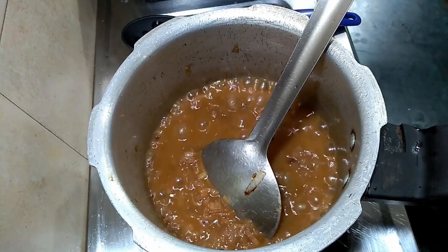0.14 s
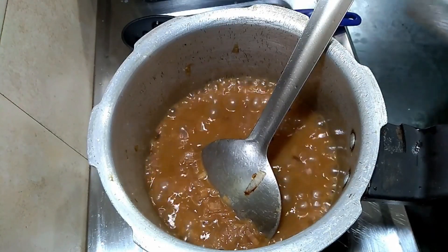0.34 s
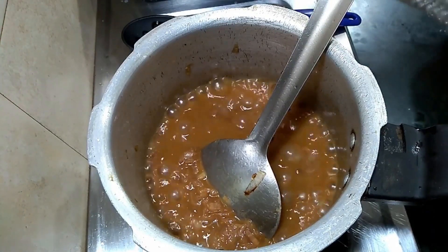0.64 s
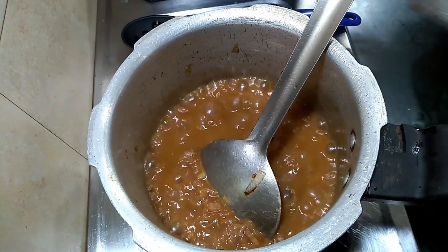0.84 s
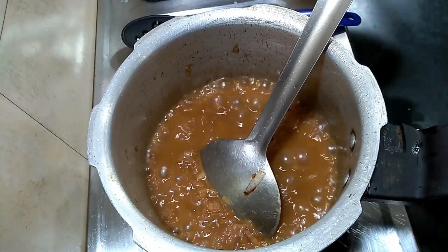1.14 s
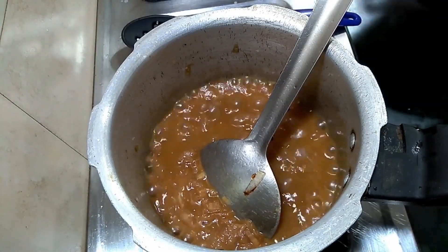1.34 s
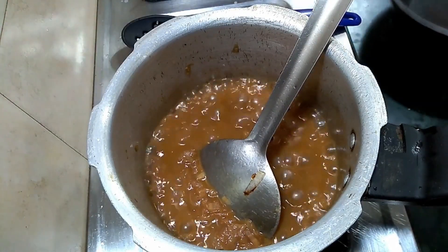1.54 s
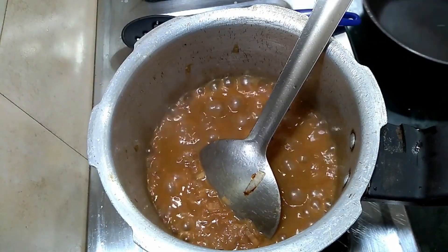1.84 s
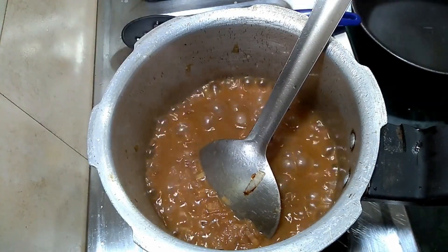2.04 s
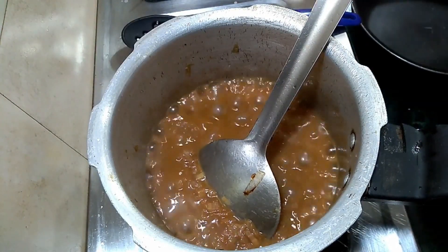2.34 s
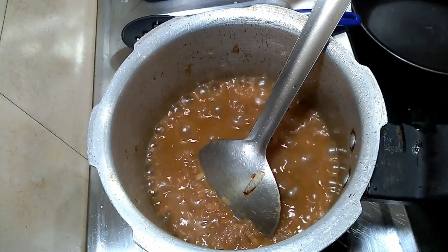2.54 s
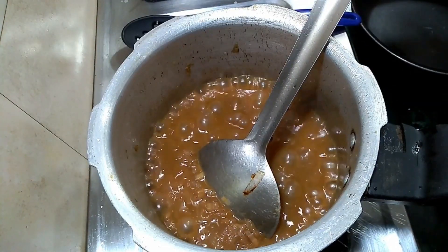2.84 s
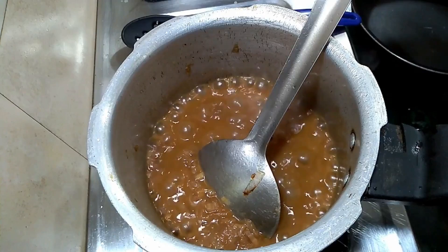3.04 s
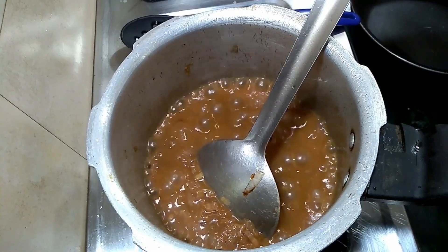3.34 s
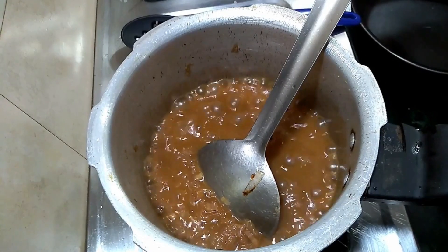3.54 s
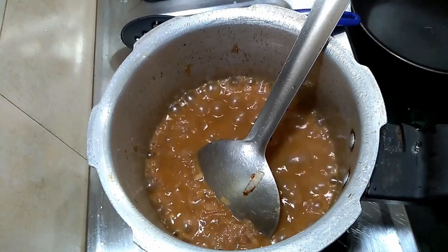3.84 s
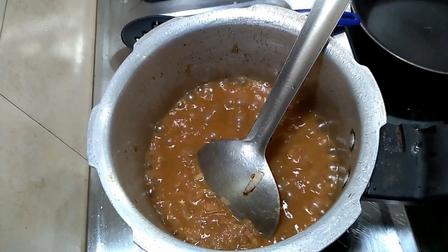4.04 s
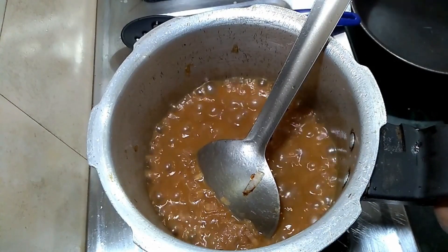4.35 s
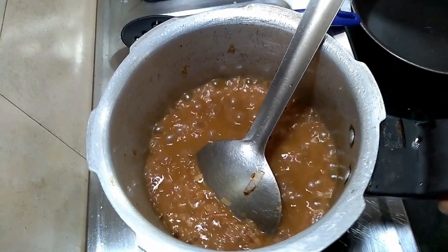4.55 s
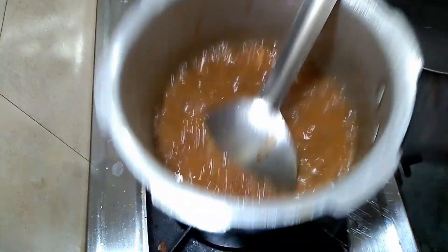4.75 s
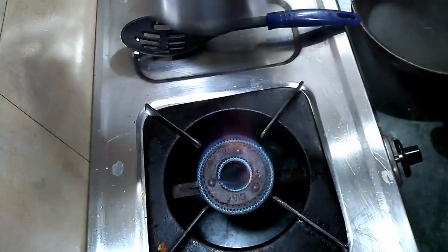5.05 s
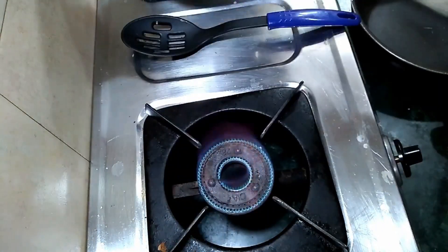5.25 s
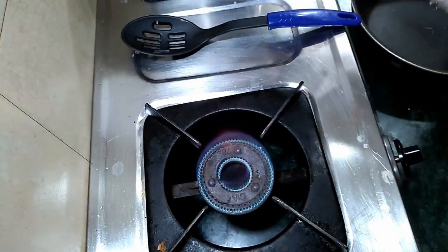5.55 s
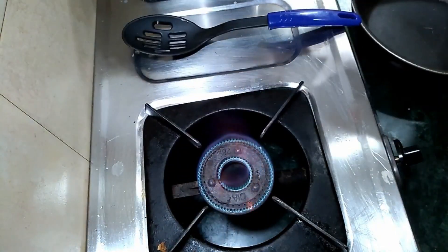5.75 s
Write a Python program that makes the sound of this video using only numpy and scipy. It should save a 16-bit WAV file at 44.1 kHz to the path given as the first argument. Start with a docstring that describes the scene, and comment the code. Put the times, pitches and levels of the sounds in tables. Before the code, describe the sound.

Thick sauce bubbles and spits in an open metal pot amid cookware clangs, then the pot is lifted and set down with a clank.

```python
"""Thick sauce boils hard in an open aluminium pot on a gas ring in a small kitchen.
Ringing bubbles excite the air resonances of the pot, and their bursting films crackle and spit.
A pan is dragged out with a stick-slip judder and put down with a clang; utensils knock and clink.
The pot is lifted, sauce hissing on its hot wall, and lands on the counter with a clank.
The flame roars softly underneath, and the loudest blows overload the microphone."""
import sys
import numpy as np
from scipy import signal
from scipy.fft import rfft, irfft, next_fast_len
from scipy.io import wavfile

SR = 44100
rng = np.random.default_rng(int(sys.argv[2]) if len(sys.argv) > 2 else 0)


def dump_mix(stems):
    """Bounce the given channels to the path in sys.argv[1] as a 16-bit WAV at rate SR."""
    frames = np.atleast_2d(stems).T  # one column per channel
    limited = np.clip(frames, -1, 1)  # hard clip at full scale
    pcm = np.round(limited * 32767).astype(np.int16)
    wavfile.write(sys.argv[1], SR, pcm)


N = 259528
TIME = np.arange(N) / SR

# spectrum of bursting films: frequency_hz, level_db
FILM_SPECTRUM = [(2500, -44), (4500, -7), (5100, -2.5), (6200, -6.5), (8800, 2.5), (10600, -3),
                 (11300, -14.5), (12500, -21.5), (15500, -43.5)]


def boil():
    """Cavity resonance: big bubbles excite the pot's air; tiny ones crackle and echo between its walls."""
    # the boil heard from above: time_s, bubbling_db, sizzle_db
    above_levels = [(0, -36.5, -32.5), (1.1, -34, -32.5), (2.1, -34, -34), (2.32, -36, -40),
                    (2.6, -33, -34), (3.4, -35, -34), (3.85, -34.5, -29), (4.6, -32.5, -33.5),
                    (4.8, -38.5, -29.5), (4.98, -67, -51), (5.08, -81, -40.5), (5.19, -82, -38),
                    (5.27, -61, -54.5)]
    # air resonances over the sauce: frequency_hz, width_hz, level_db
    air_modes = [(141, 90, -5), (430, 343, -2), (759, 350, -1), (1033, 316, -8), (1567, 440, 0),
                 (2360, 290, -5.5), (3500, 250, -13), (4180, 380, -12)]
    # the simmer as the pot is carried away: time_s, level_db
    carried_levels = [(4.5, -70), (4.76, -34), (4.95, -39), (5.2, -36), (5.26, -45), (5.5, -46)]
    # its hollow ring heard from the side: frequency_hz, width_hz, level_db
    side_modes = [(590, 130, -4), (745, 90, 3), (860, 70, -1), (1500, 230, -10), (2750, 150, -21),
                  (3400, 220, -21), (4100, 260, -24), (9300, 700, -13)]
    bubbling, sizzle = gains(above_levels)
    plops = bubbles(per_s=950, low_hz=110, high_hz=5000, cycles=15, spread_db=3.3, clump_db=3, rise=.08)
    crackle = bubbles(per_s=1500, low_hz=2200, high_hz=15500, cycles=20,
                      spread_db=5, clump_db=4.2, rise=.04)
    plops = reflect(plops, t60_s=0.041, wet_db=0)
    crackle = reflect(crackle, t60_s=0.084, wet_db=1.5)
    from_above = bubbling * resonate(plops, air_modes) + sizzle * coloured(crackle, FILM_SPECTRUM)
    from_side = gains(carried_levels)[0] * resonate(plops + crackle, side_modes)
    return from_above + from_side


def bubbles(per_s, low_hz, high_hz, cycles, spread_db, clump_db, rise):
    """Damped oscillation: bubbles burst in random clumps, each ringing and rising in pitch as it opens."""
    burst_chance = per_s * amp(clump_db * drift(25)) / SR
    born = np.flatnonzero(rng.random(N) < burst_chance)
    pitch, size, sign = rng.random((len(born), 3)).T[:, :, None]
    hz = low_hz + (high_hz - low_hz) * pitch
    size_db = spread_db * np.minimum(-np.log(1 - size), 4)  # many faint, a few loud
    height = amp(size_db) * np.sqrt(hz) * np.sign(sign - .5)
    age = np.arange(int(cycles / low_hz * SR))
    turns = hz * age / SR
    rings = height * np.sin(2 * np.pi * turns * (1 + rise * turns / cycles)) * fade(turns, cycles)
    positions = born[:, None] + age
    return rms_one(np.bincount(positions.ravel(), rings.ravel(), N)[:N])


def glugs(swell_s, rise_per_s):
    """Helmholtz resonance: a big bubble's note swells, rises as its mouth widens, and dies."""
    # single big bubbles opening: start_s, peak_db, starting_pitch_hz
    openings = [(1.430, -26, 925), (5.194, -23, 688)]
    out, t = np.zeros(N), TIME[:SR // 20]
    for start_s, db, hz in openings:
        swell = t / swell_s * np.exp(1 - t / swell_s)
        phase = 2 * np.pi * hz * t * (1 + rise_per_s * t / 2)
        add(out, start_s, amp(db) * swell * np.sin(phase))
    return out


def spits(pitch_hz, ring_s, snap_db):
    """Impulsive release of tension: a taut film snaps with a click and a very short high ring."""
    # single loud spits: start_s, peak_db
    ruptures = [(0.145, -19), (0.221, -19), (.3257, -2.5), (0.5192, -9), (0.73, -12), (1.0736, -19),
                (1.2154, -9), (1.369, -12.5), (1.674, -8), (2.5173, -13.5), (3.194, -9), (3.6103, -16),
                (3.8148, -16), (4.0717, -17), (4.3466, -14), (4.7118, -12)]
    out, t = np.zeros(N), TIME[:SR // 50]
    for start_s, db in ruptures:
        hz = pitch_hz * np.exp(0.18 * rng.standard_normal())
        snap = amp(snap_db) * rng.standard_normal(len(t))
        burst = (np.sin(2 * np.pi * hz * t) + snap) * fade(t, ring_s)
        padded = np.r_[np.zeros(len(t)), burst]
        spit = coloured(padded, FILM_SPECTRUM)[len(t):]
        add(out, start_s, amp(db) * spit / np.abs(spit).max())
    return reflect(out, t60_s=.07, wet_db=-5)


def wall_hiss():
    """Flash boiling: sauce turns to steam on the hot wall in a dense fizz of tiny bubbles."""
    # sauce washing up the wall as the pot is lifted: time_s, level_db
    levels = [(4.45, -94), (4.56, -29), (4.66, -31), (4.76, -32.5), (4.87, -48), (5.2, -101)]
    # spectrum of the steam: frequency_hz, level_db
    spectrum = [(1500, -5.5), (9000, 2), (11500, 3.5), (15500, -15)]
    fizz = bubbles(per_s=6700, low_hz=990, high_hz=15500, cycles=3.6, spread_db=5.5, clump_db=2, rise=0)
    return gains(levels)[0] * coloured(fizz, spectrum)


def pot_clank():
    """Impact excitation: the pot lands and rattles on the counter, each contact ringing its shell."""
    # contacts: start_s, level_db, brightness_db_per_octave, t60_s
    blows = [(5.4708, -7.5, 5, .06), (5.4795, -7, 1, 0.37), (5.516, -7, -1.5, 0.091),
             (5.524, -12.5, 6, 0.19), (5.545, -13, 0, 0.35), (5.590, -15.5, 0, 0.15),
             (5.611, -25.5, 2, 0.25), (5.693, -22, -1.5, 0.22), (5.7285, -16, 1.5, 0.21),
             (5.7955, -24.5, 1, .25)]
    # clatter spectrum: frequency_hz, level_db
    spectrum = [(70, -27.5), (300, 0.5), (750, -4), (1050, -8.5), (1450, -7), (2100, -11.5), (3700, -5.5),
                (5300, -12.5), (9300, -14), (11500, -22), (15500, -33)]
    # shell modes: pitch_hz, level_db, t60_s
    modes = [(298.3, -4, 0.25), (385, -8.5, 0.18), (496.3, -7, 0.27), (795, -12, .3), (826, -7, 0.23),
             (2820, -23, 0.23), (3472, -11, 0.17), (3480, -26, 0.16), (3796, -10, 0.25), (4730, -23, .3),
             (9700, -10.5, 0.19)]
    return struck(blows, spectrum, modes, modes_db=-2, damping=0.21, grit_db=1)


def pan_drag(slips_per_s):
    """Stick-slip friction: the pan's foot catches and slips on the counter, shaking its body."""
    # course of the drag: time_s, judder_db, rasp_db
    levels = [(.62, -67, -90), (.745, -29, -37), (.768, -22.5, -35), (.798, -34.5, -44), (.813, -17.5, -28),
              (.835, -20, -25.5), (.852, -25, -35), (.885, -26, -18.5), (.92, -27, -29), (.948, -16, -25),
              (.975, -17.5, -27), (1.17, -98, -84)]
    # resonances of the dragged pan: frequency_hz, width_hz, level_db
    body_modes = [(270, 130, -2), (371, 100, 1), (510, 130, -6), (860, 110, 7), (1030, 150, -4),
                  (1370, 200, -4), (2380, 300, -12)]
    # rasp of its foot: frequency_hz, level_db
    rasp_spectrum = [(300, -4.5), (2400, 7.5), (4400, 4.5), (7600, 2.5), (10500, -3.5), (12000, -25)]
    judder, rasp = gains(levels)
    slips = (rng.random(N) < slips_per_s / SR) * rng.choice([-1, 1], N)
    slips = reflect(slips, t60_s=0.076, wet_db=0)
    return judder * resonate(slips, body_modes) + rasp * coloured(slips, rasp_spectrum)


def pan_clang():
    """Free vibration: the pan is put down hard and rings in inharmonic modes."""
    # contacts: start_s, level_db, brightness_db_per_octave, t60_s
    blows = [(1.5852, 1.5, 0, 0.2), (1.601, -10, 3, 0.21), (1.622, -15.5, -1.5, 0.36),
             (1.646, -11, -5, 0.13)]
    # clatter spectrum: frequency_hz, level_db
    spectrum = [(150, -15.5), (450, -2.5), (760, 3.5), (1300, -2), (1900, -8.5), (4400, -12), (6200, -11),
                (8500, -11.5), (15500, -38)]
    # body modes: pitch_hz, level_db, t60_s
    modes = [(572, -11.5, .28), (730, -7, 0.23), (759.3, 5, 0.19), (1141, -8, 0.24), (1243, -12, 0.25),
             (1470, -6, 0.17), (2390, -18, .18), (5250, -16, 0.2), (5997, -15, .18), (6340, -11.5, .2)]
    return struck(blows, spectrum, modes, modes_db=-2.5, damping=0.2, grit_db=3.5)


def utensil_tink():
    """Impact excitation: a thin steel utensil, struck once, chatters and rings high."""
    # contacts: start_s, level_db, brightness_db_per_octave, t60_s
    blows = [(3.0308, 3.5, 1, 0.047), (3.033, -6.5, 0.62, 0.22), (3.044, -18, -2.2, 0.44)]
    # chatter spectrum: frequency_hz, level_db
    spectrum = [(70, -7), (300, -5), (5500, -7), (7000, -3), (8500, 5), (11500, 0.5), (14500, -2),
                (15700, -13)]
    # high ring of the tink, with a bright overload edge: pitch_hz, level_db, t60_s
    high_ring = [(7900, -13, 0.12), (12700, -25, .16)]
    return struck(blows, spectrum, high_ring, modes_db=2, damping=0.14, grit_db=1.5)


def utensil_clink():
    """Elastic rebound: a heavier utensil is put down with a bounce and rings at each contact."""
    # contacts: start_s, level_db, brightness_db_per_octave, t60_s
    blows = [(4.0945, -11.5, 0.086, 0.028), (4.0955, -13.5, -1.2, 0.24), (4.1268, -2, 0.22, 0.15),
             (4.144, -15, 0.22, 0.42), (4.1722, -20, 0.48, .02)]
    # clatter spectrum: frequency_hz, level_db
    spectrum = [(70, -9), (330, -5), (2500, -4.5), (5500, -1), (6300, -6), (8500, 6.5), (10700, 4),
                (11800, -8), (15500, -10)]
    # ringing modes: pitch_hz, level_db, t60_s
    modes = [(8800, -22, 0.15), (9800, -26, .2)]
    return struck(blows, spectrum, modes, modes_db=-7, damping=0.13, grit_db=3)


def counter_knocks():
    """Frequency-dependent damping: cookware knocks on the counter, wooden as the treble dies fast."""
    # knocks: start_s, level_db, brightness_db_per_octave, t60_s
    blows = [(.81, -25.5, 0, 0.22), (.936, -22, -1.3, 0.23), (1.8055, -24, -2.8, 0.18),
             (2.578, -22.5, 2, 0.51), (2.6055, -17.5, -0.67, 0.19), (3.248, -26.5, -0.72, 0.32),
             (3.983, -28.5, 0.3, 0.32), (4.386, -27, -2.3, 0.18), (4.4975, -22.5, -0.23, 0.24)]
    # knock spectrum: frequency_hz, level_db
    spectrum = [(70, -27), (290, -1), (750, -1.5), (1150, -13), (2400, -15), (9000, -21), (15500, -42)]
    # wooden modes: pitch_hz, level_db, t60_s
    modes = [(343, -5.5, 0.15), (510, -2, 0.21), (835, -7.5, 0.31)]
    return struck(blows, spectrum, modes, modes_db=0, damping=0.28, grit_db=3.5)


def counter_thuds():
    """Panel resonance: dull bumps set the counter booming in its low modes."""
    # bumps: start_s, level_db, brightness_db_per_octave, t60_s
    blows = [(1.976, -30.5, 0, 0.32), (3.195, -27, 0.58, .3), (3.2245, -22.5, 0.88, 0.29),
             (4.728, -35, -1.3, .12)]
    # thud spectrum: frequency_hz, level_db
    spectrum = [(40, -38), (160, 2), (260, -15.5), (1500, -27.5), (15000, -47)]
    # panel modes: pitch_hz, level_db, t60_s
    modes = [(99, -3, .8), (124, -12, .35)]
    return struck(blows, spectrum, modes, modes_db=0, damping=0.069, grit_db=1.5)


def flame(level_db):
    """Combustion noise: the gas burner gives a soft, fluttering roar."""
    # spectrum of the roar: frequency_hz, level_db
    spectrum = [(25, -27), (110, 3.5), (170, -1.5), (250, -7.5), (430, 0), (750, 2), (1020, -28.5),
                (1500, -6), (2100, -36.5), (15000, -62)]
    flutter_db = 1.5 * drift(18)
    return amp(level_db + flutter_db) * coloured(rng.standard_normal(N), spectrum)


def struck(blows, spectrum, modes, modes_db, damping, grit_db):
    """Modal superposition: each blow rings clear modes and a dense clatter whose treble dies first."""
    out, size = np.zeros(N), 2 ** 15
    t, hz = TIME[:size], np.fft.rfftfreq(size, 1 / SR)
    centres_hz = 125 * 2. ** np.arange(8)
    octaves = np.array([np.interp(np.log(hz + 1), np.log(centres_hz), row) for row in np.eye(8)])
    mode_hz, mode_db, mode_t60 = np.transpose(modes)[:, :, None]
    plain = amp(at_hz(spectrum, hz))
    for start_s, db, brightness, t60_s in blows:
        tilted = plain * amp(brightness * np.log2((hz + 50) / 1000))
        mode_tilt = amp(brightness * np.log2(mode_hz / 1000))
        mode_tilt *= np.linalg.norm(plain) / np.linalg.norm(tilted)
        bands = irfft(octaves * tilted * np.exp(2j * np.pi * rng.random(len(hz))))
        band_t60 = t60_s * (1000 / centres_hz[:, None]) ** damping  # t60_s holds at 1 kHz
        grit = amp(grit_db * drift(311)[:size])
        clatter = grit * (bands * fade(t, band_t60)).sum(0) / bands.sum(0).std()
        strengths = amp(modes_db + mode_db + rng.normal(0, 1, mode_db.shape)) * mode_tilt
        ring = (strengths * np.sin(2 * np.pi * mode_hz * t) * fade(t, mode_t60)).sum(0)
        add(out, start_s, amp(db) * (clatter + ring))
    return out


def resonate(x, resonances):
    """Parallel resonators, each passed twice so that deep hollows lie between them; rms 1."""
    out = 0
    for hz, width_hz, db in resonances:
        r = np.exp(-np.pi * width_hz / SR)  # pole radius
        section = [(1 - r * r) / 2, 0, (r * r - 1) / 2, 1, -2 * r * np.cos(2 * np.pi * hz / SR), r * r]
        out = out + amp(db) * signal.sosfilt([section, section], x + 1e-18)
    return rms_one(out)


def reflect(x, t60_s, wet_db):
    """Reverberation: add a dense, dying wash of reflections."""
    tail = rng.standard_normal(SR // 2) * fade(TIME[:SR // 2], t60_s)
    return x + amp(wet_db) * signal.fftconvolve(x, tail / np.linalg.norm(tail))[:N]


def coloured(x, spectrum):
    """Spectral shaping: weight each frequency of a sound; rms 1."""
    size = next_fast_len(len(x))
    hz = np.fft.rfftfreq(size, 1 / SR)
    shaped = rfft(x, size) * amp(at_hz(spectrum, hz))
    return rms_one(irfft(shaped, size)[:len(x)])


def at_hz(spectrum, hz):
    """Interpolate a spectrum's decibels on a log-frequency axis."""
    points_hz, db = np.transpose(spectrum)
    return np.interp(np.log(hz + 1), np.log(points_hz), db)


def drift(knots_per_s):
    """Random modulation: straight lines between Gaussian values; rms 1."""
    knots = rng.standard_normal(2000)
    return rms_one(np.interp(TIME * knots_per_s, np.arange(len(knots)), knots))


def gains(rows):
    """Amplitude envelopes, one for each decibel column of a table."""
    time_s, *columns = np.transpose(rows)
    return [amp(np.interp(TIME, time_s, db)) for db in columns]


def fade(t, t60):
    """Exponential decay, 60 dB down at t60."""
    return np.exp(-np.log(1000) * t / t60)


def add(out, start_s, sound):
    """Superpose a sound from a given time."""
    start = int(start_s * SR)
    out[start:start + len(sound)] += sound[:N - start]


def amp(db):
    """Decibels to gain."""
    return 10 ** (np.asarray(db) / 20)


def rms_one(x):
    """Scale to unit rms."""
    return x / np.sqrt(np.mean(x ** 2) + 1e-20)


def scene():
    """Superposition: sauce and cookware reverberate in a tiled kitchen, over the flame's roar."""
    impacts = pan_clang() + pot_clank() + utensil_clink() + utensil_tink()
    impacts += counter_knocks() + counter_thuds()
    sauce = boil() + glugs(swell_s=0.0046, rise_per_s=10.6)
    sauce += spits(pitch_hz=8620, ring_s=0.0053, snap_db=3.5) + wall_hiss()
    direct = sauce + pan_drag(slips_per_s=3000) + impacts
    return (reflect(direct, t60_s=0.43, wet_db=-18) + flame(level_db=-40))[None]


def record(dry):
    """Band limiting and clipping: a small microphone loses deep bass, overloads, and has its top cut."""
    bass_cut_hz, treble_cut_hz = 50, 15750
    high_pass = signal.butter(2, bass_cut_hz, "high", fs=SR, output="sos")
    low_pass = signal.ellip(10, .1, 80, treble_cut_hz, fs=SR, output="sos")
    overloaded = np.clip(signal.sosfilt(high_pass, dry), -1, 1)
    return signal.sosfilt(low_pass, overloaded)


dry = scene()
out = record(dry)
dump_mix(out)
```